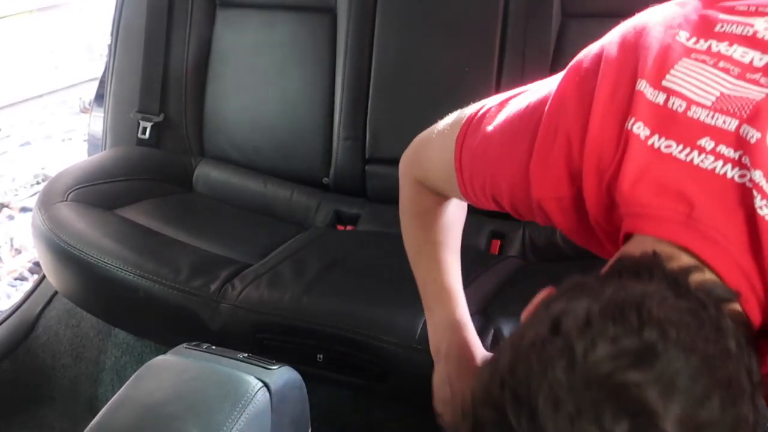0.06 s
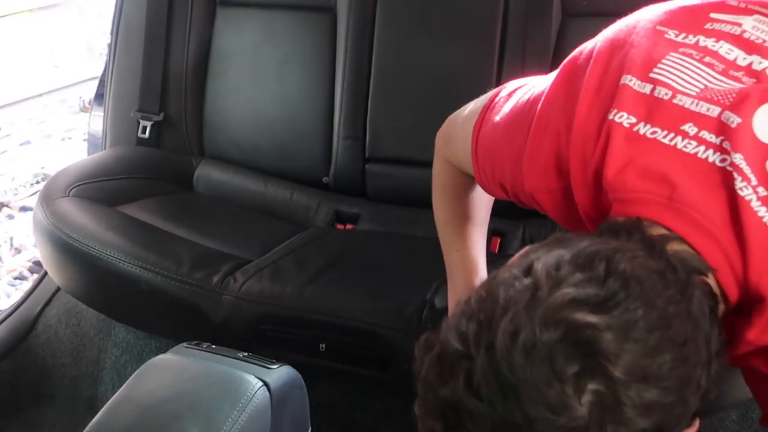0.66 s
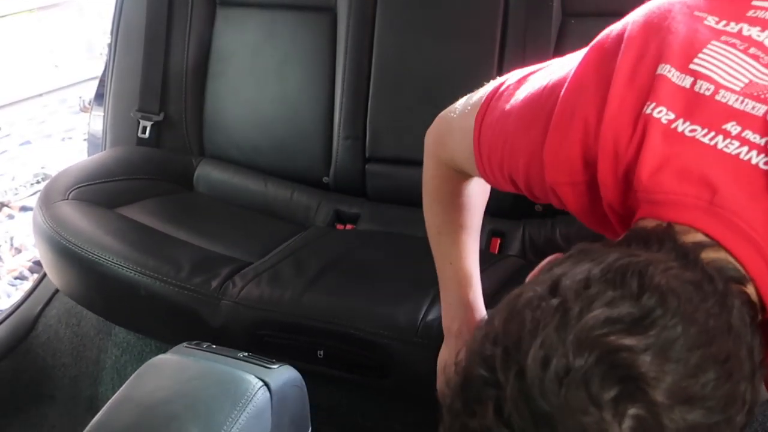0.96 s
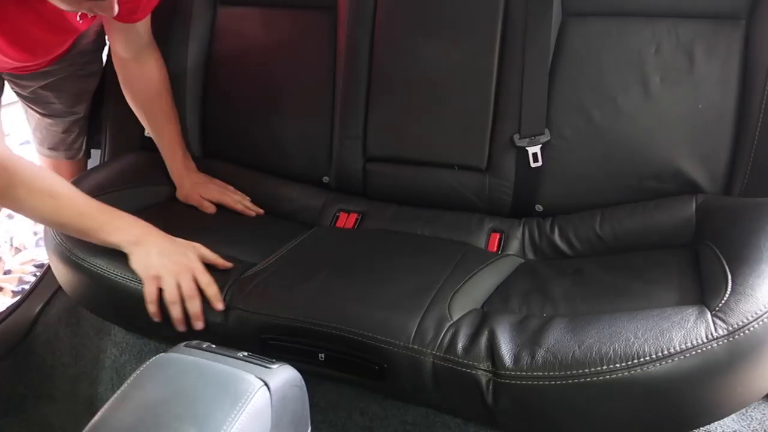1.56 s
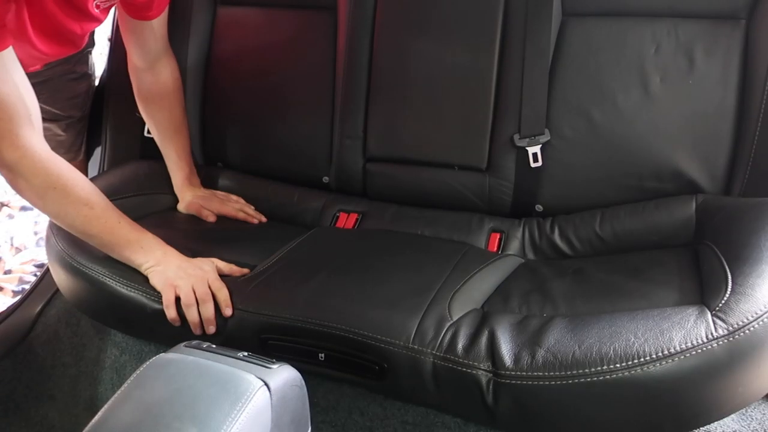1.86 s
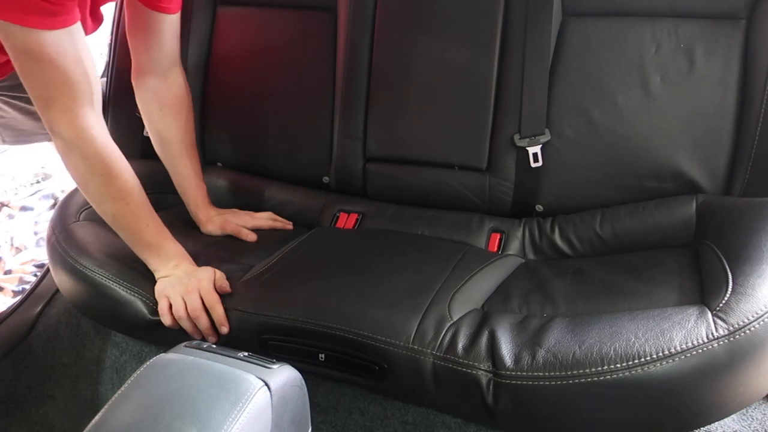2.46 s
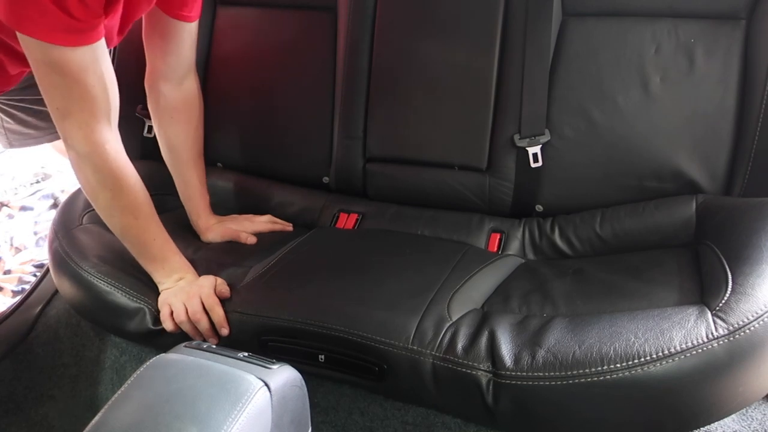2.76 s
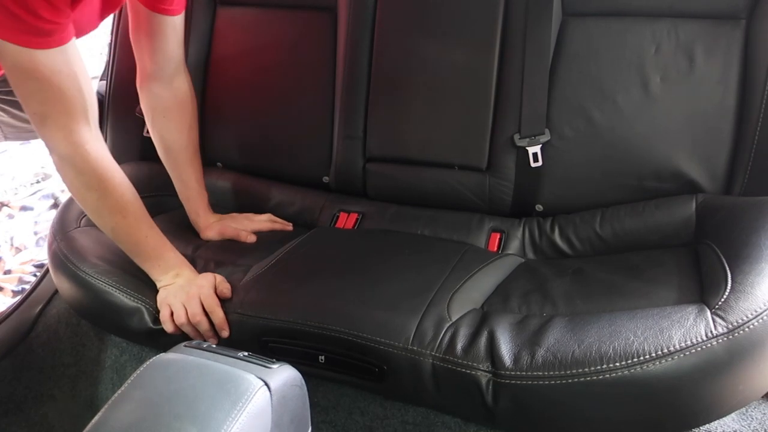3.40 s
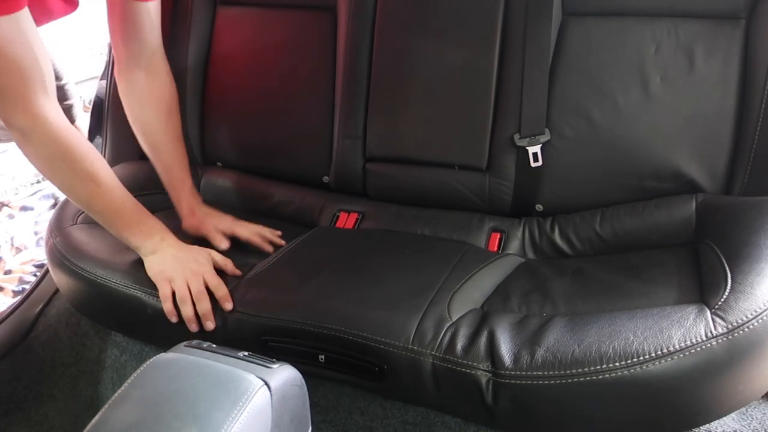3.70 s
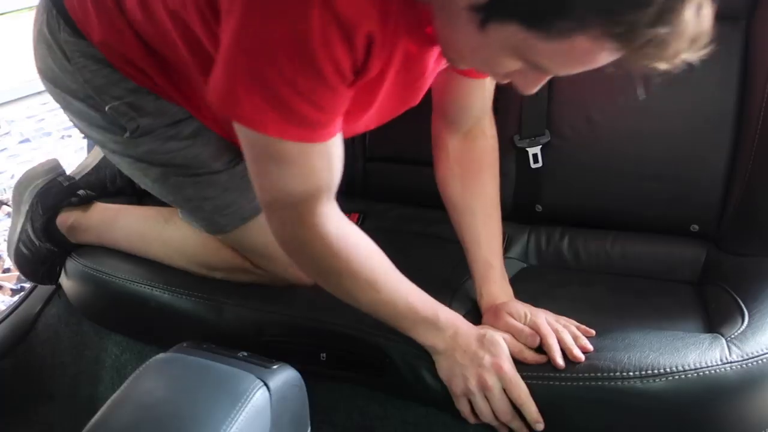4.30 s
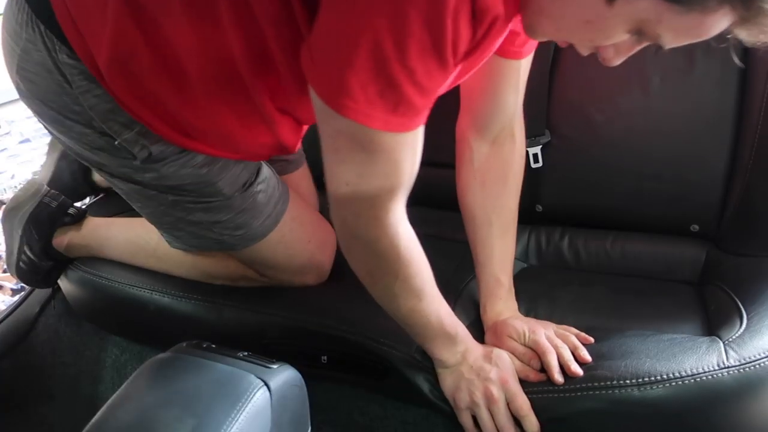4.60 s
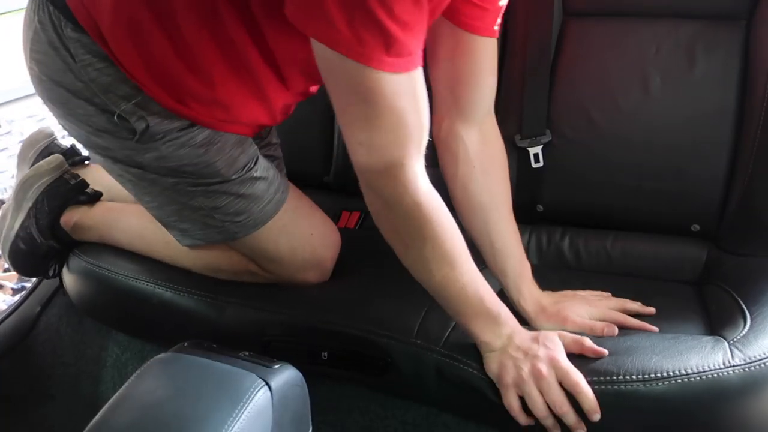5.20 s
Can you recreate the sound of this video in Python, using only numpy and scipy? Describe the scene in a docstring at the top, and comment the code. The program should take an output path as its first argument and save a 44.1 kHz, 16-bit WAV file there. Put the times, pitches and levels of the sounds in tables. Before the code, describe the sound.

A car's leather seat cushion is shoved twice with low, stuttering thuds, then patted and rubbed by hands, creaking and squeaking. One sharp, heavy snap of a metal clip is the loudest sound, and everything dips briefly after it. More presses follow, with rustling cloth, light clicks and low leather groans. The microphone is close, in the dry, enclosed cabin, with a faint rumble and hiss underneath.

```python
"""Shoving a leather car seat home

Close up in a parked car, a rear-seat cushion judders in two hard shoves, then palms thump the foam.
Hands and clothes slide over the hide, which sticks and slips in creaks and squeaks; seams and trim tick.
A retaining clip snaps home, ringing the frame and overloading the recorder, whose gain ducks and
recovers; then the leather groans under a knee. Beneath it all the car rumbles on its springs."""
import sys
import numpy as np
from scipy import signal
from scipy.fft import rfft, irfft
from scipy.io import wavfile
from scipy.ndimage import uniform_filter1d, minimum_filter1d

SR = 44100
rng = np.random.default_rng(int(sys.argv[2]) if len(sys.argv) > 2 else 0)


def wrap_up_sound(samples):
    """Save the sound to the file named by the first command line argument, as 16-bit audio."""
    columns = np.atleast_2d(samples).T
    # keep every value between -1 and 1, then stretch to whole-number steps
    tamed = np.clip(columns, -1, 1)
    steps = np.round(tamed * 32767).astype(np.int16)
    wavfile.write(sys.argv[1], SR, steps)


N = 231525

# Low cushion thumps: higher-pitched judders in the two shoves, deeper palm thumps on the foam afterwards.
# Each row: start in seconds, level in dB, tuning in Hz.
THUMPS = [(0.5297, -20, 201), (0.5369, -6.5, 222), (0.5527, -9.5, 171), (0.5728, -6, 205),
          (0.5827, -7.5, 205.4), (0.5931, -11, 206), (0.6287, -18, 188), (0.6495, -16.5, 198),
          (0.7156, -22, 206), (0.8224, -16, 205), (0.8426, -6.5, 213.4), (0.8529, -3, 200.5),
          (0.8689, -3, 200), (0.9023, -10, 207), (0.9156, -4.5, 201.8), (0.9426, -17.5, 199),
          (0.9606, -18, 248.4), (1.14, -27, 71), (1.465, -24, 185), (1.520, -19, 167), (1.621, -17, 162),
          (1.67, -26, 169), (1.748, -30, 150), (1.812, -27.5, 175), (2.118, -21.5, 231),
          (2.249, -26.5, 165), (2.389, -30, 160), (2.424, -28, 229), (3.198, -23, 155), (3.682, -38, 168),
          (4.197, -28, 162), (4.311, -19.5, 85), (4.721, -22, 171), (4.757, -21, 238.4)]


def thumps(scuff_db=-21, contact_s=0.0021, base_tuning_hz=203.6):
    """Each judder or palm thump is a soft blow that rings the cushion and scuffs it on the floor pan."""
    # The cushion's modes at base tuning. Each row: frequency in Hz, level in dB, t60 in seconds.
    cushion_modes = [(68, -42, 0.035), (121.2, -5.5, 0.1), (206, 7.5, 0.059), (231.2, -8.5, 0.12),
                     (319.6, -4.5, 0.073), (384, -17, 0.08), (493.3, -10.5, 0.085), (706, -10.5, 0.028)]
    # Scuff on the floor pan. Each row: frequency in Hz, level in dB.
    scuff_colour = [(60, -14.5), (110, -7.5), (200, 5), (330, 15), (520, -6.5), (800, 0.5), (1200, -15.5),
                    (2500, -18), (3500, -39), (6000, -58.5)]
    contact = 1 - np.exp(-np.arange(SR) / SR / contact_s)
    out = np.zeros(N + SR)
    for s, db, tuning in THUMPS:
        modes = [(hz * tuning / base_tuning_hz, level, t60) for hz, level, t60 in cushion_modes]
        ring = high_pass(ringing(modes) * contact, hz=45.2)
        start = int(s * SR)
        out[start:start + SR] += from_db(db) * peak_one(ring)
    s, db, _ = np.transpose(THUMPS)
    scuff = bursts(clicks(s, db), seconds=0.024, rise_s=0.0028, colour=scuff_colour)
    return out[:N] + from_db(scuff_db) * scuff


def snap(crack_db=-1, grate_db=-13, ring_db=-23, boom_db=-11, tail_db=-24, rattle_db=-18,
         contact_s=0.0023):
    impacts = [(3.2927, 16.5, -32.5), (3.2940, -12, 5), (3.2983, 23, 11), (3.3010, -9, -1.5),
               (3.3097, -3.5, -16), (3.317, 2, -28)]
    # Modes of the seat frame and floor pan, then of the cabin and body panels.
    # Each row: frequency in Hz, level in dB, t60 in seconds.
    frame_modes = [(754, -16, .4), (925, 6, 0.14), (1090, -10.5, 0.14), (1460, -10.5, 0.28),
                   (1657, -8, 0.25), (1960, -15.5, .18), (2169, -11.5, .12), (2900, -21, .26),
                   (3120, -18, 0.26), (3849, -24, .25), (5080, -8.5, .13)]
    boom_modes = [(53.7, -16, 0.6), (90, -2, 0.052), (200, -3, 0.05), (235, -1, 0.07), (328, -12, 0.2),
                  (371, -9, .2), (455, -8, .12), (515, -4, 0.07), (610, -9, 0.14)]
    # Dull thud, dark tail, hard crack, loose rattle and grating metal.
    # Each row: frequency in Hz, level in dB.
    thud_colour = [(25, -18), (60, 2.5), (100, 7.5), (135, -3.5), (190, -4), (280, -11), (355, 0),
                   (430, 1.5), (530, -5), (680, -11.5), (1100, -12.5), (4000, -71)]
    tail_colour = [(30, -12.5), (52, -28.5), (110, -11.5), (210, -3), (340, 0), (560, -4), (660, -11),
                   (800, -16), (1200, -24.5), (1700, -25.5), (2800, -28.5), (5000, -38.5), (9000, -74)]
    crack_colour = [(300, -12), (750, -46), (950, 0), (1200, -15.5), (1600, 14.5), (2500, 11.5),
                    (3700, -16.5), (4600, -14), (5150, 2), (6000, -21), (9000, -28), (15000, -33.5)]
    rattle_colour = [(500, -12), (900, 1.5), (1150, -2.5), (1600, 10), (2400, 1), (3500, -2.5), (4400, -10),
                     (5300, -12.5), (6500, -14.5), (8000, -20.5), (10000, -42.5)]
    grate_colour = [(1000, 2), (1800, -2.5), (3300, 8.5), (4500, -18), (5150, 0.5), (6000, -22.5),
                    (7700, -8.5), (9000, -19), (15000, -25)]
    s, thud_levels, crack_levels = np.transpose(impacts)
    thuds, cracks = clicks(s, thud_levels), clicks(s, crack_levels)
    thud = pulse_of(thud_colour) * (1 - np.exp(-np.arange(SR) / SR / contact_s))
    tail = peak_one(coloured(dying_noise(t60=0.43), tail_colour))
    body = thud + from_db(boom_db) * ringing(boom_modes) + from_db(tail_db) * tail
    rattle = peak_one(coloured(dying_noise(t60=0.2), rattle_colour))
    metal = from_db(crack_db) * pulse_of(crack_colour) + from_db(ring_db) * ringing(frame_modes)
    metal += from_db(rattle_db) * rattle
    grate = from_db(grate_db) * bursts(cracks, seconds=0.0025, rise_s=0.0002, colour=grate_colour)
    return convolve(cracks, metal) - convolve(thuds, body) + grate


def push_levels(attack_s=0.02, release_s=0.016, foam_db=(-13, -6), foam_s=0.15):
    """Drum and creak gains: each push builds, holds and lets go, then lingers as the foam swells back."""
    # A hand or knee bears down. Each row: start and length in seconds, drumming in dB, creak in dB.
    pushes = [(-0.03, .12, -34, -40), (0.117, 0.13, -45, -42), (0.38, 0.22, -40, -40),
              (0.711, 0.29, -34, -40.5), (1.088, 0.32, -43.5, -42.5), (1.285, 0.16, -35.5, -39.5),
              (1.506, 0.032, -28, -44), (1.603, 0.091, -38.5, -37), (1.731, 0.13, -33.5, -42),
              (1.859, 0.12, -54, -46), (2.052, 0.27, -43, -61), (2.217, 0.048, -31.5, -40),
              (2.313, 0.06, -39, -49.5), (2.405, 0.11, -43, -54.5), (2.681, 0.21, -45.5, -47.5),
              (3.155, 0.11, -42, -51), (3.665, 0.027, -27, -39), (3.822, 0.14, -41, -65),
              (3.884, 0.083, -36, -45), (4.13, 0.12, -39, -52.5), (4.305, 0.23, -29, -33),
              (4.562, 0.13, -42.5, -38), (4.703, 0.062, -30.5, -35.5), (4.878, 0.32, -40, -39.5),
              (5.083, 0.17, -33.5, -38)]
    t, power = np.arange(N) / SR, np.zeros((2, N))
    for start, length, drum_db, creak_db in pushes:
        since_release = np.maximum(t - start - length, 0)
        attack = np.clip((t - start) / attack_s, 0, 1)
        recovery = np.outer(from_db(foam_db), np.exp(-since_release / foam_s))
        release = np.maximum(np.exp(-since_release / release_s), recovery)
        power += (from_db([[drum_db], [creak_db]]) * attack * release) ** 2
    return np.sqrt(power)


def creak(drum_gain, creak_gain, slips_per_s=165, jitter=0.22, spread_db=3.0, grit=1.26,
          edge_db=-14, drum_db=1.0):
    """The loaded hide sticks and slips unevenly; each slip drums the cushion and has a papery edge."""
    # Drumming cushion, creaking hide and papery edge. Each row: frequency in Hz, level in dB.
    drum_colour = [(70, -26), (105, -19.5), (135, 1.5), (160, -0.5), (185, -6), (215, -7), (260, -11.5),
                   (400, -41.5)]
    hide_colour = [(190, -26), (260, -5), (310, -1.5), (370, 1.5), (430, -5), (520, -1.5), (620, -5),
                   (720, -11), (900, -10.5), (1200, -15), (1600, -22), (2500, -52)]
    edge_colour = [(900, -5.5), (1250, -0.5), (1650, 1.0), (2600, -5.0), (4000, -16.0), (7000, -21.0),
                   (14000, -42.5)]
    gaps, sizes = rng.standard_normal((2000, 2)).T
    times = np.cumsum(np.exp(jitter * gaps)) / slips_per_s
    inside = times < N / SR
    slips = rms_one(clicks(times[inside], spread_db * sizes[inside]))
    gritty = slips + grit * rng.standard_normal(N)
    drum = evened(coloured(gritty, drum_colour), seconds=0.45)
    hide = evened(coloured(gritty, hide_colour), seconds=0.11)
    edge = rms_one(coloured(gritty, edge_colour))
    return drum_gain * from_db(drum_db) * drum + creak_gain * (hide + from_db(edge_db) * edge)


def groans(jitter=0.035, spread_db=0.5, fade_s=0.015):
    """Under a steady load the slips lock into a nearly even train: a low note through the cushion."""
    # A knee or palm rubs the hide. Each row: start and length in seconds, slips per second, level in dB.
    rubs = [(4.378, 0.033, 130, -23.5), (4.452, 0.12, 154, -24.5), (4.625, 0.029, 170, -31.5),
            (5.082, 0.042, 166, -28.5), (5.175, 0.1, 182, -35)]
    # The groan's dark body. Each row: frequency in Hz, level in dB.
    colour = [(100, -3.5), (150, -2), (305, -8.5), (460, -16), (700, -24.5), (1500, -43), (3000, -45)]
    t, out = np.arange(N) / SR, np.zeros(N)
    for start, length, per_s, db in rubs:
        gaps, sizes = rng.standard_normal((60, 2)).T
        times = start + (np.cumsum(np.exp(jitter * gaps)) - 1) / per_s
        note = coloured(clicks(times, spread_db * sizes), colour)
        gate = np.clip(np.minimum(t - start, start + length + fade_s - t) / fade_s, 0, 1)
        out += from_db(db) * gate * note / np.std(note[gate > 0])
    return out


def slide(rub_trim_db=0.5, hiss_trim_db=-2.0, grip_db=1.3, grip_s=0.02):
    """Palms and clothes drag across the grain of the leather, gripping now more, now less."""
    # Sweeps over the hide. Each row: fastest moment, rise and fall in seconds, rub in dB, hiss in dB.
    strokes = [(0.0, .02, 0.047, -47, -69), (0.191, 0.15, 0.033, -55.5, -56),
               (0.519, 0.13, 0.097, -47, -63.5), (0.868, 0.019, 0.017, -45, -67),
               (0.93, 0.03, 0.026, -45, -69.5), (1.259, 0.095, 0.075, -42.5, -56),
               (1.425, 0.093, 0.075, -32, -41), (1.55, 0.11, 0.17, -35.5, -41.5),
               (1.67, 0.084, 0.16, -43.5, -64), (1.89, 0.09, 0.075, -48, -60),
               (2.126, 0.0069, 0.044, -52, -59), (2.17, 0.13, 0.13, -46, -84),
               (2.326, 0.16, 0.058, -38, -49.5), (2.45, 0.11, 0.055, -49, -66.5),
               (2.78, 0.37, 0.19, -67, -78.5), (3.699, 0.035, 0.14, -40.5, -50),
               (3.85, 0.087, 0.055, -51, -60), (4.21, 0.041, 0.04, -48.5, -56),
               (4.32, 0.049, 0.042, -51, -55), (4.48, 0.37, 0.46, -48.5, -79),
               (4.72, 0.17, 0.08, -48, -57.5), (4.99, 0.057, 0.048, -47.5, -52),
               (5.11, 0.097, 0.094, -43.5, -50.5)]
    # Coarse rub and fine hiss. Each row: frequency in Hz, level in dB.
    rub_colour = [(500, 9), (900, 1.5), (1200, -3), (1700, -1), (2400, 3), (3100, 0.5), (4000, -10.5),
                  (5000, -8.5), (6500, -22), (9000, -36.5)]
    hiss_colour = [(3500, 8.5), (6000, 9), (7500, 8), (9300, 4), (11000, 6.5), (14000, 1), (15500, -21)]
    rub_gain, hiss_gain = np.sqrt(sum(np.outer(from_db(levels), swell(s, rise, fall)) ** 2
                                      for s, rise, fall, *levels in strokes))
    wander = rms_one(convolve(rng.standard_normal(N), np.hanning(int(2 * grip_s * SR))))
    grip = from_db(grip_db * wander)
    rub = rub_gain * friction(rub_colour, per_s=650, spread_db=3.0, smooth=1.0)
    hiss = hiss_gain * friction(hiss_colour, per_s=1800, spread_db=3.5, smooth=0.93)
    return grip * (from_db(rub_trim_db) * rub + from_db(hiss_trim_db) * hiss)


def squeaks(octave_db=-15):
    """Skin chatters on the leather: a hoarse, gliding tone with a weak octave swells and fades."""
    # Grips in mid-slide. Each row: loudest moment and half-length in seconds, pitch in Hz,
    # bandwidth as a share of the pitch, glide in octaves per second, level in dB.
    grips = [(0.425, 0.062, 304.2, 0.36, 4, -30), (1.405, 0.036, 2656, 0.14, 2, -33.5),
             (1.527, 0.021, 2537, 0.32, -2.5, -25), (1.559, 0.013, 2404, .3, -2.5, -29.5),
             (1.662, 0.043, 2742, 0.35, 0.5, -38.5), (2.253, 0.14, 2770, 0.43, 1, -47.5),
             (2.31, 0.0344, 2413, 0.21, -2.5, -36.5), (3.868, 0.034, 2380, .35, -3, -45),
             (5.147, 0.18, 359.3, 0.44, 0, -34)]
    t, out = np.arange(N) / SR, np.zeros(N)
    chatter = rng.standard_normal((2, N))
    for s, half_length, hz, width_share, glide, db in grips:
        near = np.abs(t - s) < 2.5 * half_length
        since = t[near] - s
        blur = signal.butter(2, hz * width_share / 2, fs=SR, output="sos")
        real, imaginary = signal.sosfilt(blur, chatter[:, near])
        phase = 2 * np.pi * np.cumsum(hz * 2 ** (glide * since)) / SR
        band = (real + 1j * imaginary) * np.exp(1j * phase)  # slow noise shifted up to the pitch
        tone = rms_one(band.real) + from_db(octave_db) * rms_one((band ** 2).real)
        out[near] += from_db(db) * np.exp(-2 * (since / half_length) ** 2) * tone
    return out


def cloth():
    """Folds of cloth catch and let go on the leather: a broad, grainy rustle."""
    # Shorts and shirt drag and crumple. Each row: loudest moment, rise and fall in seconds, level in dB.
    drags = [(2.55, 0.16, 0.12, -56), (2.8, 0.078, 0.18, -52), (3.94, .08, 0.042, -46.5),
             (4.371, 0.057, 0.083, -36), (4.5, 0.12, 0.1, -37), (4.73, 0.045, 0.028, -40.5),
             (5.11, .07, 0.074, -40)]
    # The soft rustle. Each row: frequency in Hz, level in dB.
    colour = [(100, -9), (150, 17), (220, 4), (310, 6), (450, 7), (700, 4), (1200, -6), (1550, 3),
              (2100, -10), (3200, -12.5), (4200, -19), (8000, -28.5), (14000, -46)]
    gain = np.sqrt(sum((from_db(db) * swell(s, rise, fall)) ** 2 for s, rise, fall, db in drags))
    return gain * friction(colour, per_s=1900, spread_db=4.5, smooth=0.86)


def ticks(click_db=-4.0, crunch_db=-9):
    """Seams and plastic trim give small dry clicks, each trailing a brief crunch."""
    # Ticks of seams and trim. Each row: start in seconds, knock in dB, tick in dB.
    trim_ticks = [(0.1302, -17, -31), (0.1495, -16, -46), (0.203, -21, -33), (0.298, -30, -45),
                  (0.468, -30, -28), (0.529, -7, -33.5), (0.73, -24, -33.5), (0.776, -19, -50),
                  (0.963, -13, -35), (1.261, -20.5, -24), (1.309, -24.5, -44), (1.467, -16.5, -40),
                  (1.755, -18, -34), (2.123, -42, -38), (2.661, -27, -40), (2.763, -25, -36),
                  (2.8502, -25.5, -41), (3.178, -26, -36), (3.279, -24, -32), (3.684, -20, -27),
                  (4.151, -30, -52.5), (4.196, -22, -26.5), (4.22, -23, -26.5), (4.313, -25, -32),
                  (4.453, -18.5, -25.5), (4.719, -33, -32), (4.758, -24, -33), (4.855, -36, -43),
                  (5.001, -17, -20), (5.161, -12.5, -28)]
    # Hollow knock and bright tick. Each row: frequency in Hz, level in dB.
    knock = [(150, 8.5), (330, 4.0), (520, 3), (750, 1.5), (1150, -17.5), (1550, -17.5), (2500, -18.5),
             (6000, -55.5)]
    tick = [(900, 9.5), (1600, 10.0), (2700, 7.5), (4000, -8.0), (5200, -10), (7500, -14.5),
            (14000, -21.5)]
    s, knock_db, tick_db = np.transpose(trim_ticks)
    out = np.zeros(N)
    for db, colour in ((knock_db, knock), (tick_db, tick)):
        hits = clicks(s, db)
        out += from_db(click_db) * convolve(hits, pulse_of(colour))
        out += from_db(crunch_db) * bursts(hits, seconds=0.0055, rise_s=0.0004, colour=colour)
    return out


def creases(width_share=0.27, decay_s=0.0017):
    """Taut creases of the hide let go: a few milliseconds of crisp crackle round one pitch."""
    # Popping creases. Each row: start in seconds, pitch in Hz, level in dB.
    pops = [(0.4683, 4530, -40.5), (0.775, 2970, -40.5), (0.848, 3250, -42), (0.909, 3450, -42),
            (1.1765, 3280, -44), (2.736, 2970, -43), (2.768, 5160, -47), (2.85, 2700, -37),
            (2.872, 5260, -52), (4.614, 5260, -40), (4.753, 5000, -39.5), (4.9075, 3230, -46)]
    t, out = np.arange(SR // 10) / SR, np.zeros(N + SR)
    edge_ratio = 1 + width_share / 2
    for s, hz, db in pops:
        band = signal.butter(1, [hz / edge_ratio, hz * edge_ratio], "band", fs=SR, output="sos")
        crackle = rng.standard_normal(len(t)) * np.exp(-t / decay_s)
        pop = signal.sosfilt(np.vstack([band, band]), crackle)
        start = int(s * SR)
        out[start:start + len(t)] += from_db(db) * peak_one(pop)
    return out[:N]


def fittings(click_db=-2, chink_db=-11):
    """Metal fittings touch: a sharp click and a very short chink."""
    # Metal on metal. Each row: start in seconds, level in dB.
    touches = [(0.1305, -43), (0.469, -35), (0.5277, -44), (0.908, -39), (0.9631, -30), (1.2354, -30),
               (1.754, -27)]
    # The bright click. Each row: frequency in Hz, level in dB.
    colour = [(1500, -9), (2800, -3.5), (4000, 1), (5200, -4), (6500, -10.5), (8500, -12.5), (14000, -24)]
    hits = clicks(*np.transpose(touches))
    chink = bursts(hits, seconds=0.0029, rise_s=0.00026, colour=colour)
    return from_db(click_db) * convolve(hits, pulse_of(colour)) + from_db(chink_db) * chink


def sway(load, rest_db=-44, push_db=-3.5, thump_db=-16.5, rise_s=0.0019, settle_s=0.055):
    """The car rocks on its springs: a deep rumble that swells with each push and thump, then settles."""
    # The rumble. Each row: frequency in Hz, level in dB.
    colour = [(15, -8.5), (30, -18.5), (46, -4.5), (62, -14.0), (90, -16.0), (140, -18.0)]
    t = np.arange(SR) / SR
    settling = ((1 - np.exp(-t / rise_s)) * np.exp(-t / settle_s)) ** 2
    push_power = convolve((from_db(push_db) * load) ** 2, settling / settling.sum())
    s, db, _ = np.transpose(THUMPS)
    thump_power = convolve(clicks(s, db + thump_db) ** 2, settling)
    rumble = evened(coloured(rng.standard_normal(N), colour), seconds=0.41)
    return np.sqrt(from_db(rest_db) ** 2 + push_power + thump_power) * rumble


def ambient(level_db=-57):
    """Faint outdoor air comes through the open door."""
    # Outdoor air. Each row: frequency in Hz, level in dB.
    colour = [(25, -7), (49, -13), (121, -10.5), (264, -8.5), (394, -40.5), (488, -11.5), (673, -16),
              (3090, -36.5), (8780, -47)]
    return from_db(level_db) * rms_one(coloured(rng.standard_normal(N), colour))


def purr(start_s=2.48, end_s=3.17, per_s=29.6, level_db=-61, sharpness=1.7, fade_s=0.037, uneven_db=0.5):
    """A faint background purr: soft puffs of noise, evenly spaced but of unequal strength."""
    # The purr's narrow band. Each row: frequency in Hz, level in dB.
    colour = [(850, -26.5), (1100, 3), (1300, -4), (1600, -13), (2200, -19)]
    t = np.arange(N) / SR
    gate = np.clip(np.minimum(t - start_s, end_s - t) / fade_s, 0, 1)
    strength = from_db(uneven_db * rng.standard_normal(200))[(per_s * t).astype(int)]
    puffs = strength * np.abs(np.sin(np.pi * per_s * t)) ** (2 * sharpness)
    return from_db(level_db) * gate * rms_one(coloured(puffs * rng.standard_normal(N), colour))


def port_hiss(side_db=-53.0, mid_db=-59):
    """The microphone's own noise, stronger between its two ports than in common."""
    # Steady hiss. Each row: frequency in Hz, level in dB.
    colour = [(60, -26), (170, 1), (450, 3.5), (1100, -3.5), (2700, -7.5), (5000, -13), (9000, -21),
              (14000, -35.5)]
    mid, side = (rms_one(coloured(noise, colour)) for noise in rng.standard_normal((2, N)))
    return from_db(mid_db) * mid + from_db(side_db) * np.array([side, -side])


def cabin(x, wet, width_db=-2.0):
    """The bass arrives directly and alike at both ports; the treble scatters round the cabin."""
    # Stereo spread between the ports. Each row: frequency in Hz, side level in dB.
    side_colour = [(60, -63.5), (200, -55.5), (400, -22.5), (700, -24.5), (1300, -5.5), (2400, -9.5),
                   (4400, 0), (8000, 4.5), (14000, 11.5)]
    mid = x + wet * reflections(x, t60=0.06, low_hz=700)
    side = from_db(width_db) * coloured(reflections(x, t60=0.05, low_hz=60), side_colour)
    # the hands work nearer the left port
    side += 0.028 * signal.sosfilt(signal.butter(1, [1000, 5000], "band", fs=SR, output="sos"), mid)
    return np.array([mid + side, mid - side])


def reflections(x, t60, low_hz, size=2048):
    """Dense, short echoes off windows and trim; their pattern keeps changing as hands and body move."""
    x = high_pass(np.pad(x, (size, 2 * size)), low_hz)
    out, fade = np.zeros(len(x)), np.sin(np.pi * np.arange(size) / size)
    for start in range(0, N + size, size // 2):
        echoes = dying_noise(t60, size=size)
        part = signal.fftconvolve(x[start:start + size] * fade, echoes / np.linalg.norm(echoes))
        out[start:start + len(part)] += part
    return out[size:size + N]


def gain_control(x, limit_db=-3.5, max_cut_db=11, attack_s=0.0014, hold_s=0.56, recovery_db_per_s=13):
    """Peaks over the limit duck the recorder's gain; it holds, then creeps back up."""
    peak_db = 20 * np.log10(np.abs(x).max(axis=0) + 1e-9)
    over_db = np.clip(peak_db - limit_db, 0, max_cut_db)
    hold = int(hold_s * SR)
    held_db = -minimum_filter1d(-over_db, hold, origin=(hold - 1) // 2, mode="nearest")
    recovery_db = recovery_db_per_s * np.arange(N) / SR
    cut_db = np.maximum.accumulate(held_db + recovery_db) - recovery_db
    pole = np.exp(-1 / (attack_s * SR))
    return x * from_db(-signal.lfilter([1 - pole], [1, -pole], cut_db))


def friction(colour, per_s, spread_db, smooth):
    """Tiny random slips of uneven size over a share of smooth noise, coloured and at unit rms."""
    sizes = from_db(spread_db * np.minimum(rng.exponential(1, N), 4)) * rng.choice([-1, 1], N)
    slips = rms_one(sizes * (rng.random(N) < per_s / SR))
    return rms_one(coloured(slips + smooth * rng.standard_normal(N), colour))


def swell(s, rise, fall, roundness=1.94):
    """Gain of a sweep that speeds up and slows down; roundness 1 is pointed, 2 a bell."""
    t = np.arange(N) / SR
    away = np.minimum(np.maximum((s - t) / rise, (t - s) / fall), 10)
    return np.exp(-away ** roundness)


def bursts(hits, seconds, rise_s, colour):
    """Each hit sets off a quickly dying puff of coloured noise."""
    t = np.arange(SR) / SR
    envelope = convolve(hits, np.exp(-t / seconds) * (1 - np.exp(-t / rise_s)))
    response = response_of(colour)
    return convolve(envelope * rng.standard_normal(N), response / np.linalg.norm(response))


def clicks(times, db):
    """One impulse per event."""
    out = np.zeros(N)
    samples = np.round(np.asarray(times) * SR).astype(int)
    np.add.at(out, np.clip(samples, 0, N - 1), from_db(db))
    return out


def ringing(modes):
    """A second of decaying sines, peak 1."""
    t = np.arange(SR) / SR
    return peak_one(sum(from_db(db - 60 * t / t60) * np.sin(2 * np.pi * hz * t) for hz, db, t60 in modes))


def dying_noise(t60, size=SR):
    """Noise that starts at rms 1 and dies away."""
    return rng.standard_normal(size) * from_db(-60 * np.arange(size) / SR / t60)


def pulse_of(colour):
    """A blow of peak 1 with the given spectrum, padded to a second."""
    pulse = peak_one(response_of(colour))
    return np.pad(pulse, (0, SR - len(pulse)))


def response_of(colour, size=8192):
    """Minimum-phase impulse response of a spectrum, falling steeply beyond its ends."""
    hz, db = np.transpose(colour)
    grid = np.log(np.maximum(np.fft.rfftfreq(size, 1 / SR), 1))
    outside = np.maximum(np.log(hz[0]) - grid, 0) + np.maximum(grid - np.log(hz[-1]), 0)
    cepstrum = irfft(np.log(from_db(np.interp(grid, np.log(hz), db))) - 2 * outside)
    cepstrum[1:size // 2] *= 2
    cepstrum[size // 2 + 1:] = 0
    return irfft(np.exp(rfft(cepstrum)))


def coloured(x, colour):
    """Shape x with an EQ curve."""
    return convolve(x, response_of(colour))


def convolve(x, response):
    """Pass x through an impulse response."""
    return signal.fftconvolve(x, response)[:len(x)]


def high_pass(x, hz):
    """Shed the bass below hz."""
    return signal.sosfilt(signal.butter(2, hz, "high", fs=SR, output="sos"), x)


def evened(x, seconds):
    """Hold the short-term rms at 1, keeping the finer grain."""
    power = uniform_filter1d(x ** 2, int(seconds * SR))
    return x / np.sqrt(np.maximum(power, 0) + 1e-12)


def rms_one(x):
    """Scale to unit rms."""
    return x / np.sqrt(np.mean(x ** 2) + 1e-20)


def peak_one(x):
    """Scale to unit peak."""
    return x / np.abs(x).max()


def from_db(db):
    """Decibels to gain."""
    return 10 ** (np.asarray(db) / 20)


def scene():
    """Everything sounds in the cabin: the blows fairly dry, friction and background more scattered."""
    drum_gain, creak_gain = push_levels()
    rubbing = creak(drum_gain, creak_gain) + slide() + cloth() + squeaks() + groans()
    ticking = ticks() + creases() + fittings()
    background = sway(drum_gain) + ambient() + purr()
    return cabin(rubbing + ticking + background, wet=0.74) + cabin(thumps() + snap(), wet=0.25)


def record(dry):
    """The microphone hisses and sheds deep bass; the gain ducks, peaks squash and the top is cut."""
    ducked = gain_control(high_pass(dry + port_hiss(), hz=27.5))
    squashed = ducked / (1 + ducked ** 12) ** (1 / 12)  # soft clip at full scale
    top_cut = signal.ellip(10, 0.2, 80, 15400, fs=SR, output="sos")
    return signal.sosfilt(top_cut, squashed)


dry = scene()
out = record(dry)
wrap_up_sound(out)
```